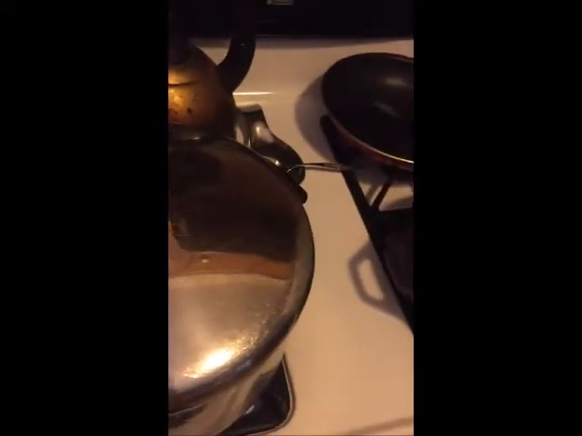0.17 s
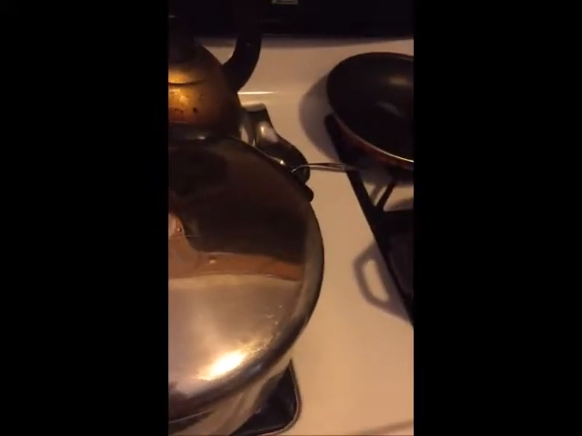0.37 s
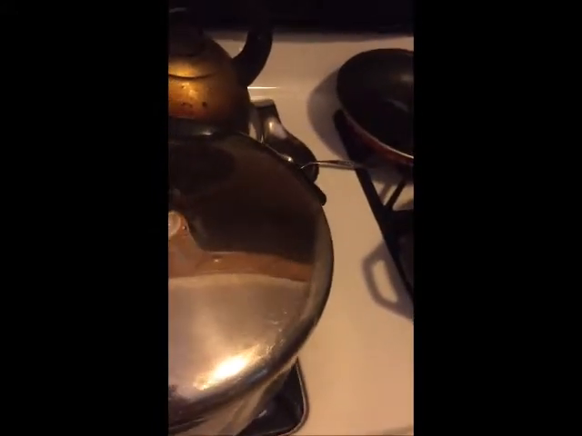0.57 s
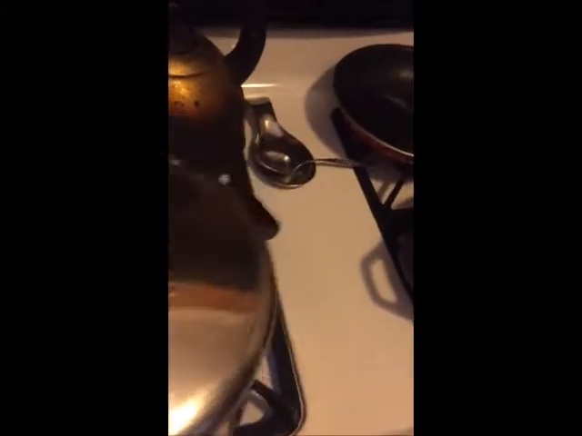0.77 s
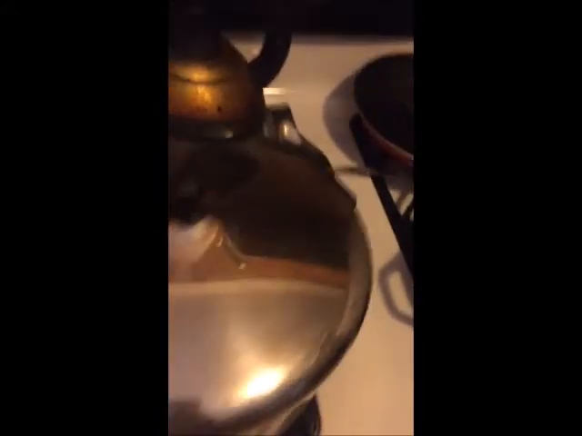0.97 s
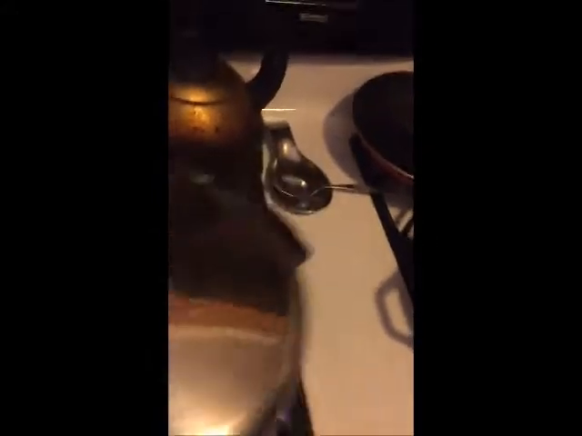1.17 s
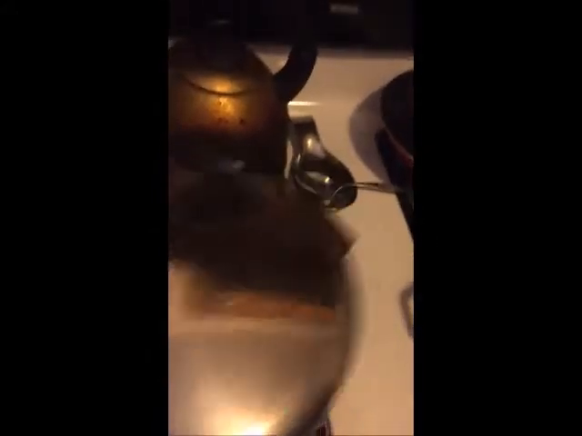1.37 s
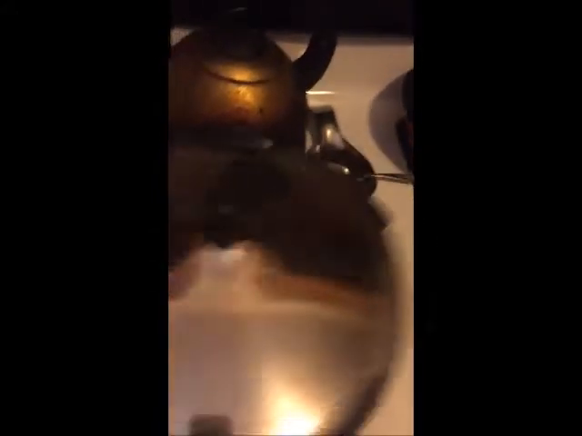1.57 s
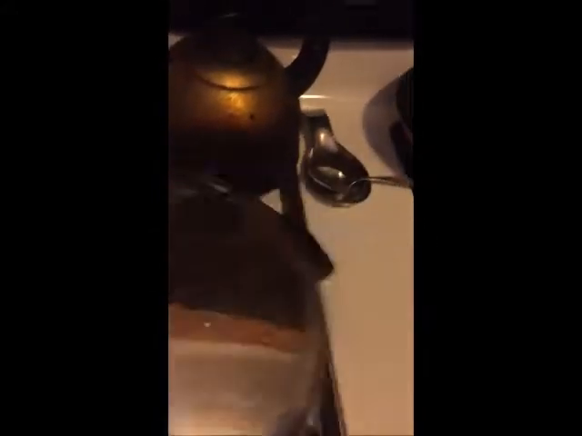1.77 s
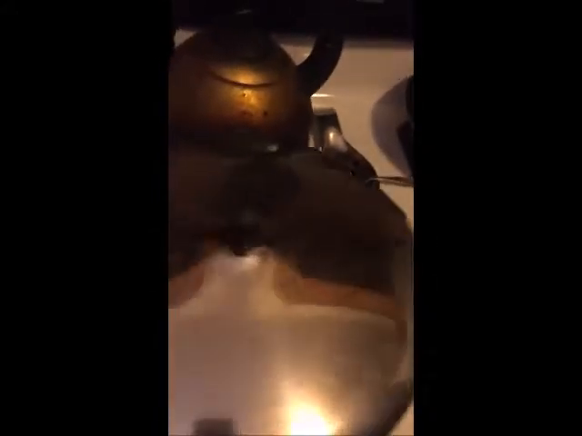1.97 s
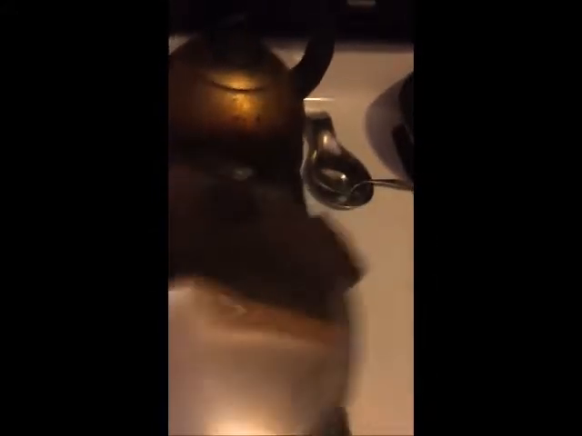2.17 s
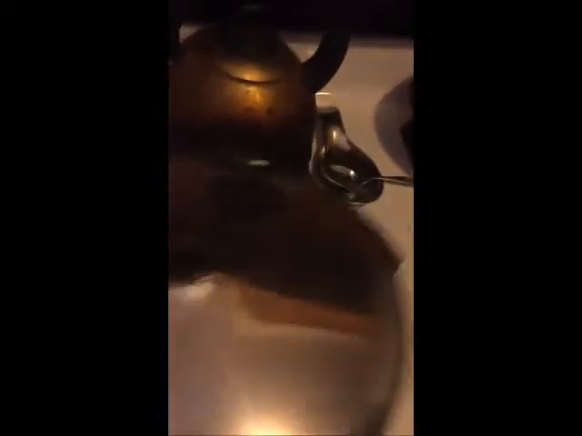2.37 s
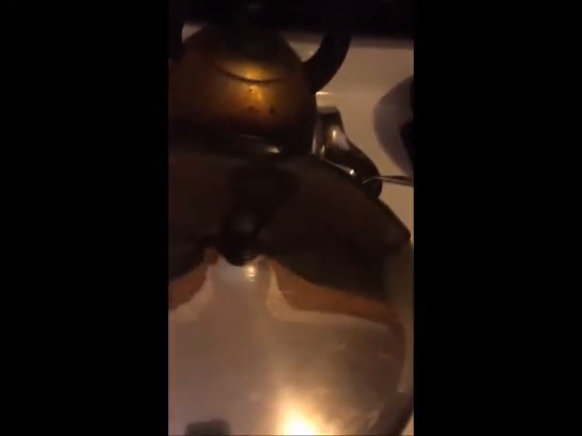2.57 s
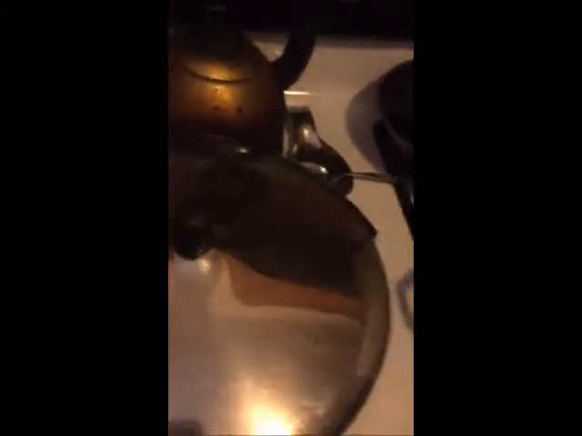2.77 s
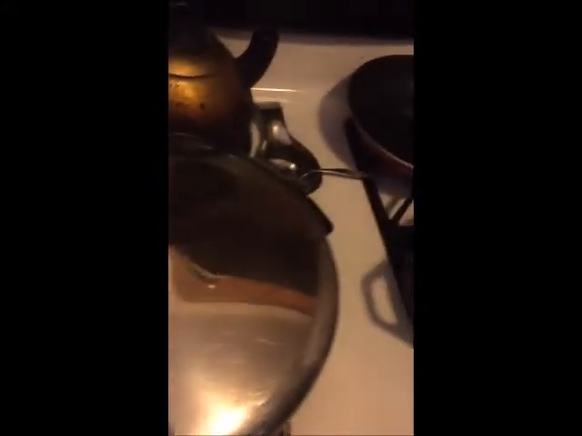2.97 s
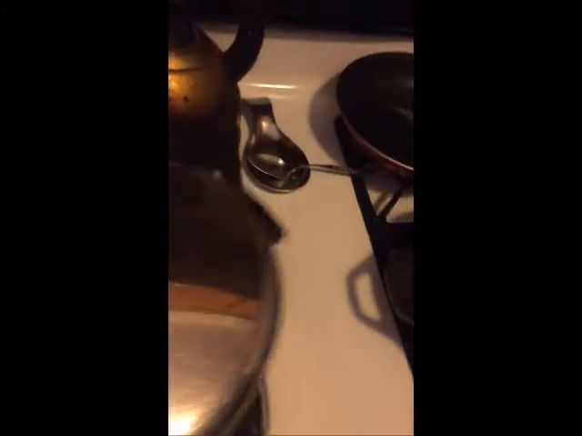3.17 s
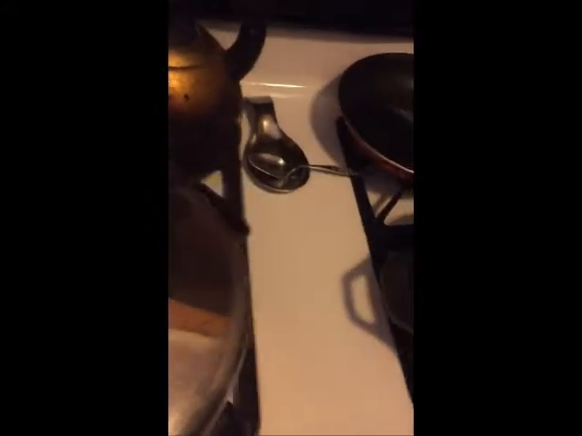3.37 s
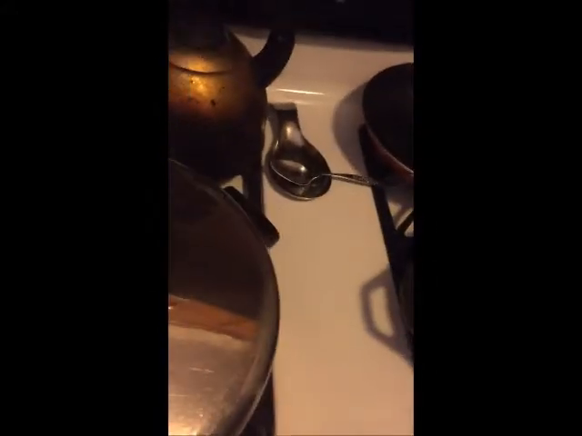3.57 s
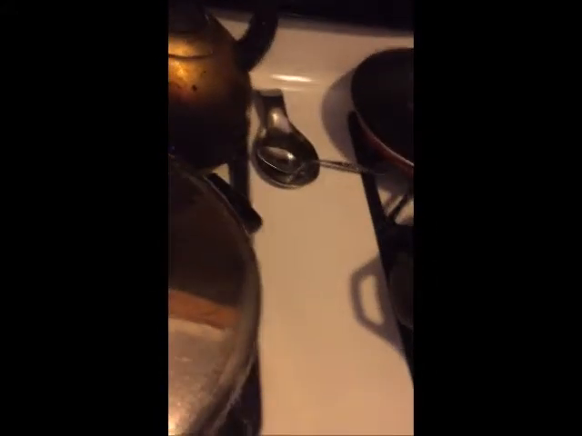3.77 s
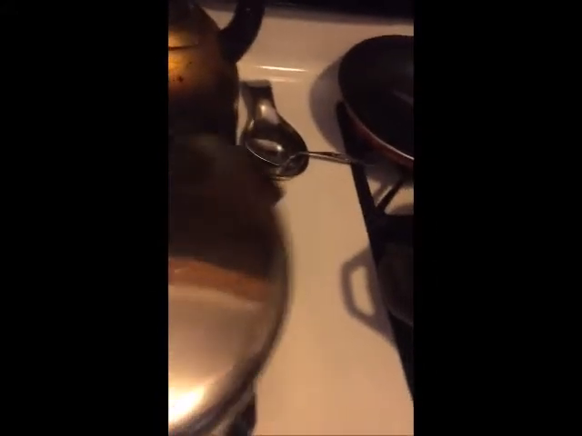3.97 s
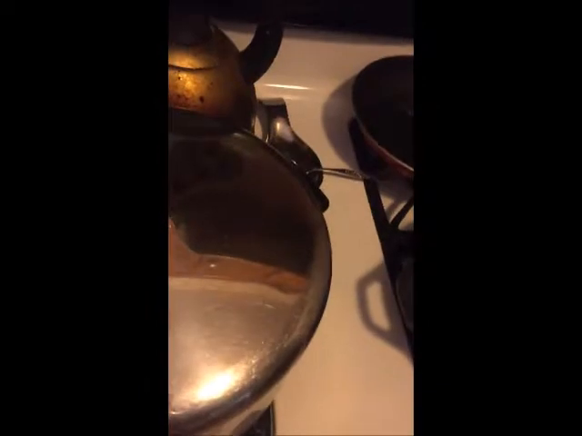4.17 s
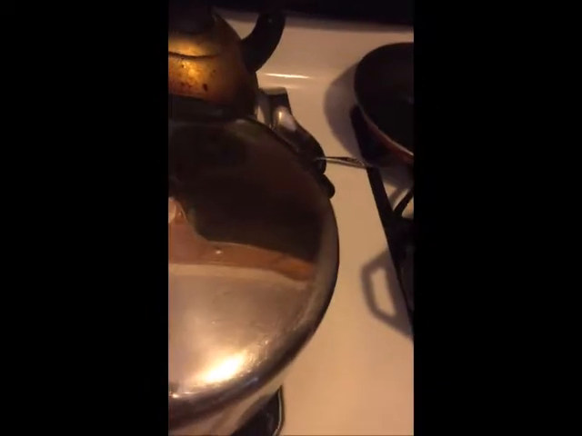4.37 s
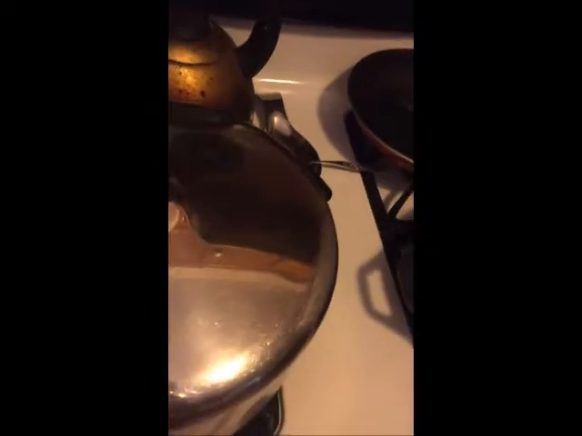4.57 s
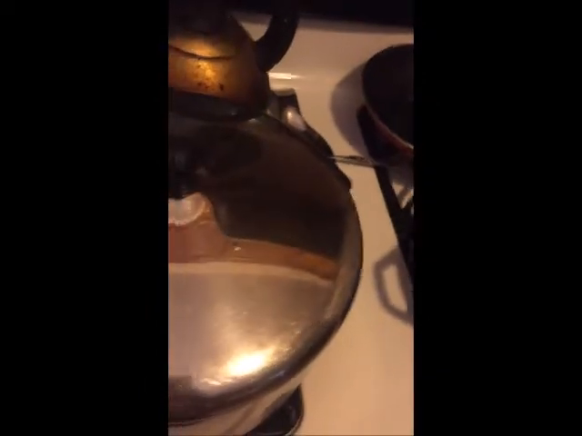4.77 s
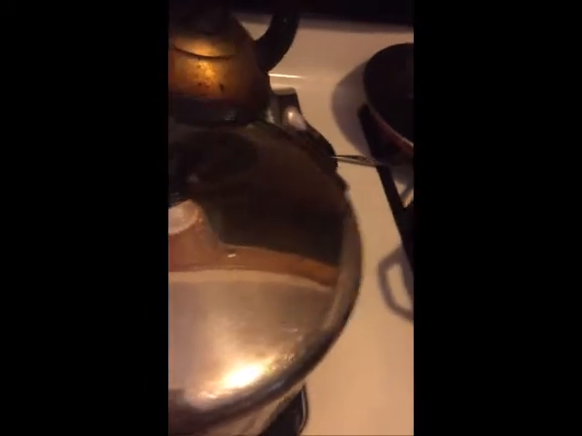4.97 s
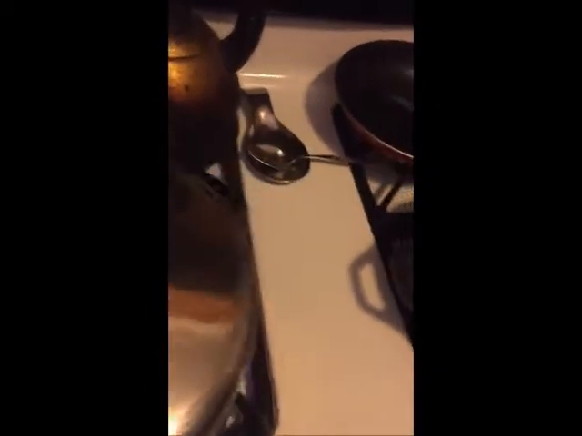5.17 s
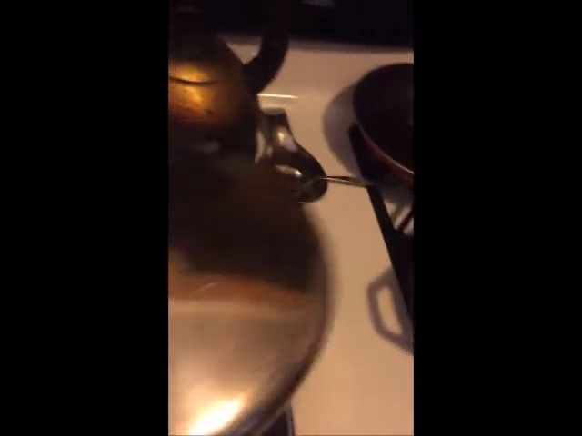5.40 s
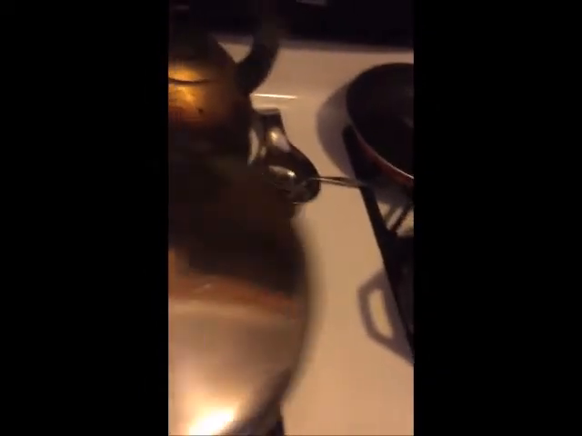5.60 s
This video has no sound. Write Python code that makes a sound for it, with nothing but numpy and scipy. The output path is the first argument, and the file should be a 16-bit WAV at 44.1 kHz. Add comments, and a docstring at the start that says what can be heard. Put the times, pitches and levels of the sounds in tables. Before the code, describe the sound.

A gas burner rushes softly throughout, heard close up in a small kitchen with a short reverberation. For the first second, popcorn kernels pop unevenly inside a lidded steel pot, each a crisp crack with a small thump and a brief metallic ring. A scrape begins at about 0.7 seconds. From 1 to 2.7 seconds the pot is shaken hard, the loudest stretch: its base grinds back and forth and clanks on the iron grate, kernels rattle and the loose lid chinks. A quick cluster of pops follows around 2.9 seconds. Scattered pops continue, with a short scrape and two knocks at about 3.3 to 3.5 seconds and a soft slide with dull taps just after 4. Pops come thicker from 4.3 to 4.9 seconds. Scraping returns at 5.1, with a sharp clank and lid chink near 5.4 and a last light scrape.

```python
"""A small kitchen, close to a gas stove: popcorn pops in a lidded steel pot shaken on the iron grate.
Each bursting kernel is an impulse: its hull cracks, the pot rings and a puff of steam thumps the air
under the lid. Stick-slip friction makes the base scrape; impacts on the bars excite the modes of pot
and grate, and the loose lid chinks. The burner rushes softly underneath."""
import sys
import numpy as np
from scipy import signal
from scipy.fft import rfft, irfft
from scipy.io import wavfile
from scipy.ndimage import uniform_filter1d

SR = 44100
rng = np.random.default_rng(int(sys.argv[2]) if len(sys.argv) > 2 else 0)


def materialize(psi):
    """Save the field psi as 16-bit PCM at rate SR to the path in sys.argv[1].

    A 1-D psi becomes a single channel; in a 2-D psi each row is a channel.
    """
    bounded = np.clip(np.atleast_2d(psi).T, -1, 1)
    quanta = np.round(bounded * 32767).astype(np.int16)
    wavfile.write(sys.argv[1], SR, quanta)


N = 248724
RING_SIZE = 12288  # samples in one impulse response
AGE = np.arange(RING_SIZE) / SR  # time since an impact, s
TIME = np.arange(N) / SR


def undb(db):
    """Amplitude ratio of a level in decibels."""
    return 10 ** (np.asarray(db) / 20)


def unit(x):
    """Normalisation to unit energy."""
    return x / np.sqrt(np.sum(x ** 2) + 1e-18)


def peak(x, size=220):
    """Greatest short-time rms amplitude."""
    return np.sqrt(uniform_filter1d(x ** 2, size).max())


def blend(parts):
    """Superposition of (sound, peak level/dB) pairs."""
    return sum(x / peak(x) * undb(db) for x, db in parts)


def add(track, t, x):
    """Superposition of a sound on the track from t seconds on."""
    i = max(int(t * SR), 0)
    track[i:i + len(x)] += x[:max(N - i, 0)]


def fade(t60):
    """Exponential damping: 60 dB in t60 seconds."""
    return np.exp(-np.log(1000) * AGE / max(t60, 1e-3))


def swell(rise_s):
    """Onset transient: vibration needs a moment to spread round the pot."""
    return 1 - np.exp(-AGE / max(rise_s, 1e-4))


def walk(rate_hz):
    """Slow random modulation with a spread near 1."""
    return np.interp(TIME * rate_hz, np.arange(2048), rng.standard_normal(2048))


def band(x, lo_hz, hi_hz, order=2):
    """Causal band-pass filtering."""
    edges = [lo_hz, min(hi_hz, SR / 2 - 1)]
    return signal.sosfilt(signal.butter(order, edges, "band", fs=SR, output="sos"), x)


def split(x, low_hz=370, high_hz=3300):
    """A fourth-order crossover yields bass, middle and treble; group delay makes the bass lag."""
    def side(v, hz, kind):
        return signal.sosfilt(np.tile(signal.butter(2, hz, kind, fs=SR, output="sos"), (2, 1)), v)
    above = side(x, low_hz, "high")
    return side(x, low_hz, "low"), side(above, high_hz, "low"), side(above, high_hz, "high")


def colour(x, spectrum, patchy_db=0, patch_hz=110):
    """Spectral shaping; random peaks stand for the fine modes that one blow happens to favour."""
    hz, db = np.transpose(spectrum)
    f = np.maximum(np.arange(len(x) // 2 + 1) * SR / len(x), 1)
    chance = rng.standard_normal(size=1024)
    patches = patchy_db * np.interp(f / patch_hz, np.arange(len(chance)), chance)
    gain = undb(np.interp(np.log(f), np.log(hz), db) + patches)
    return irfft(rfft(x) * gain, len(x))


def ring(modes, scatter_db, detune):
    """Modal superposition: a random striking point gives each damped mode its own share and sign."""
    out = 0
    for (hz, db, t60), (share, shift, side) in zip(modes, rng.uniform(-1, 1, (len(modes), 3))):
        wave = fade(t60) * np.sin(2 * np.pi * hz * (1 + 2 * detune * shift) * AGE)
        out = out + np.sign(side) * undb(db + scatter_db * share) * unit(wave)
    return unit(out)


def contacts(n, rate_hz, spread_db):
    """A Poisson train of tiny impacts, a few much harder than the rest."""
    hits = rng.random(n) < rate_hz / SR
    strength = undb(spread_db * np.minimum(rng.standard_normal(n), 2))
    return hits * strength * rng.choice([-1, 1], n)


def burner(level_db=-44.5, flutter_db=7.0):
    """Combustion noise of the gas flame: a low rush that flutters within bounds, and a smooth hiss."""
    # flame spectrum: f/Hz, level/dB
    flame_spectrum = [(30, -2), (100, 9), (200, 5.5), (420, -9.5), (700, -1), (1100, -8.5), (1900, -10.5),
                      (3000, -16), (4600, -26), (6000, -28.5), (10000, -36.5), (16000, -47)]
    flame = colour(rng.standard_normal(N), flame_spectrum)
    bass, mid, treble = split(flame / np.std(flame))
    rush = bass * undb(flutter_db * np.tanh(walk(8.8)))
    return undb(level_db) * (rush + mid * undb(0.9 * walk(8)) + treble)


def kitchen(x, wet_db=-13, low_t60=0.58, mid_t60=0.4, high_t60=0.26, build_s=0.013):
    """Reverberation: stove top, wall and cupboards add a short diffuse tail."""
    bass, mid, treble = split(rng.standard_normal(RING_SIZE))
    tail = bass * fade(low_t60) + mid * fade(mid_t60) + treble * fade(high_t60)
    tail *= 1 - np.exp(-(AGE / build_s) ** 2)
    return x + undb(wet_db) * signal.fftconvolve(x, unit(tail))[:N]


def pot(modes_db=-2, bass_t60=0.15, mid_t60=0.13, treble_t60=0.1):
    """Impulse response of the pot: distinct modes over a dense crowd of short-lived ones."""
    # spectrum of the dense wall modes: f/Hz, level/dB
    wall_spectrum = [(30, -73), (70, 4), (200, 12), (320, 3.5), (460, 3.5), (800, 5), (1100, 0.5),
                     (1700, 0.5), (2400, -4.5), (4200, -11), (4950, -15), (6000, -11), (10000, -28),
                     (16000, -32.5)]
    # distinct modes of the pot: f/Hz, level/dB, t60/s
    pot_modes = [(169.2, -8, 0.12), (193.4, -8.5, 0.066), (237.3, -6, 0.17), (312.6, 2, 0.087),
                 (423, -21.5, 0.9), (567.6, -10, 0.37), (677.2, -4.5, 0.085), (751.3, -6, 0.089),
                 (935, -11.5, 0.26), (1060, -40.5, 0.16), (1284, -10.5, 0.035), (1704, -14, 0.056),
                 (1807, -6, 0.13), (1950, -7.5, 0.032), (2324, -11.5, 0.055), (2736, -17, 0.37),
                 (3245, -20, 0.83), (3965, -19, 0.22), (4614, -19.5, 0.27), (5480, -22, 0.18),
                 (5970, -22, 0.079), (6610, -26, 0.11), (8420, -27.5, 0.12), (8970, -25, 0.047),
                 (9570, -26, 0.066), (11710, -28, 0.056)]
    bass, mid, treble = split(colour(rng.standard_normal(RING_SIZE), wall_spectrum, patchy_db=4))
    crowd = bass * fade(bass_t60) + mid * fade(mid_t60) + treble * fade(treble_t60)
    return unit(unit(crowd) + undb(modes_db) * ring(pot_modes, scatter_db=6.5, detune=0.0039))


def crack(t60):
    """Brittle fracture of a hull: a damped burst of broadband noise."""
    # spectrum of the crack: f/Hz, level/dB
    hull_spectrum = [(200, 4), (1000, -11.5), (3000, -5.5), (4500, -7.5), (6000, -3.5), (7400, -7.5),
                     (9500, 7), (11200, 0.5), (13000, -3.5), (16000, -19)]
    return colour(rng.standard_normal(RING_SIZE), hull_spectrum, patchy_db=3.5, patch_hz=260) * fade(t60)


def taps(rise_s=0.0022):
    """Contact time limits bandwidth: the soft blows of the rocking pot leave its high modes quiet."""
    # light contacts: t/s, level/dB, upper cutoff f/Hz
    soft_blows = [(0.338, -31.5, 1000), (0.434, -34.5, 800), (0.587, -29, 950), (2.847, -25.5, 1180),
                  (3.518, -27.5, 6100), (3.540, -18, 1400), (3.862, -27, 1720), (4.092, -24.5, 1700),
                  (4.111, -20, 1220), (4.163, -23.5, 900), (4.216, -23.5, 402), (4.835, -22.5, 1180),
                  (4.975, -35, 914), (5.246, -17, 350), (5.308, -20.5, 5000), (5.576, -17, 1070)]
    out = np.zeros(N)
    for t, db, cutoff_hz in soft_blows:
        tap = band(pot(), 49, cutoff_hz, order=3) * swell(rise_s)
        add(out, t, blend([(tap, db)]))
    return out


def lid(level_db=-3):
    """Contact damping: the loose lid hops on the rim, which stops its ring almost at once."""
    # hops of the lid: t/s, level/dB
    chinks = [(0.886, -24), (0.933, -15), (1.205, -5), (1.274, -13), (1.331, -2.5), (1.3548, -8),
              (1.61, -15.5), (1.7942, -20.5), (1.9966, -7.5), (2.0455, -6.5), (2.2478, -3.5), (2.27, -10),
              (2.3221, -5.5), (2.5651, -8), (2.5996, -11.5), (2.6523, -16), (2.8494, -45), (3.448, -27),
              (3.8622, -27.5), (5.308, -14.5)]
    # modes of the lid: f/Hz, level/dB, t60/s
    lid_modes = [(1680, -6.5, 0.16), (1757, 1.5, 0.08), (1873, -6.5, 0.18)]
    out = np.zeros(N)
    for t, db in chinks:
        add(out, t, blend([(ring(lid_modes, scatter_db=1, detune=0.0031), db + level_db)]))
    return out


def slips(count=14, size=1100):
    """Stick-slip excitation: the contact point wanders over the base, so the timbre keeps changing."""
    spots = [pot() for _ in range(count)]
    out = np.zeros(N)
    for start in range(0, N, size):
        force = unit(contacts(size, rate_hz=400, spread_db=7))
        add(out, start / SR, signal.fftconvolve(force, spots[rng.integers(count)]))
    return out


def push(start_s, rise_s, hold_s, slowing_db_per_s=117):
    """Relative sliding speed in one stroke: the hand raises and holds it, then friction slows the pot."""
    age = TIME - start_s
    slowing = undb(-slowing_db_per_s * np.maximum(age - rise_s - hold_s, 0))
    return np.clip(age / max(rise_s, 1e-3), 0, 1) * slowing


def scrape(level_db=-3, bass_db=-2, bright_db=-1, kernels_db=5, judder_db=1.02,
           groan_db=-2, groan_hz=320, groan_top_db=-23, turn_s=0.014, treble_power=1.71):
    """Sliding friction: the base groans and grinds, brighter with speed; hard shakes rattle kernels."""
    # pushes and pulls of the pot: t/s, rise/s, hold/s, level/dB, relative treble/dB
    strokes = [(0.743, 0.091, 0.11, -25.5, -13), (0.981, 0.017, 0.023, -16.5, -8),
               (1.139, 0.01, .1, -15, -4), (1.318, 0.0097, 0.013, -14.5, 0),
               (1.489, 0.039, 0.041, -17, -5.5), (1.649, .01, 0.047, -16.5, -6),
               (1.817, 0.034, 0.058, -15, -4), (1.976, 0.011, 0.051, -15.5, -1),
               (2.149, 0.025, .03, -13.5, -3.5), (2.232, 0.0078, 0.11, -17, -2.5),
               (2.469, 0.028, 0.018, -18, -5.5), (2.524, 0.02, 0.043, -16, -5),
               (2.644, 0.013, 0.039, -21, -10.5), (2.776, 0.046, 0.044, -26.5, -13.5),
               (3.195, 0.027, 0.15, -31, -19), (3.332, 0.018, 0.013, -20, -13),
               (4.048, 0.08, 0.075, -23.5, -12.5), (5.112, .09, 0.12, -24.5, -13.5),
               (5.357, .012, 0.011, -16, -2), (5.554, 0.047, .04, -23.5, -11)]
    grind = slips()
    bands = (*split(grind), band(grind, 0.927 * groan_hz, 1.076 * groan_hz))
    bass, mid, treble, groan = (x / np.std(x) for x in bands)
    kernel_hits = contacts(N, rate_hz=260, spread_db=6)
    ticks = signal.fftconvolve(kernel_hits, band(crack(t60=.02), 3000, 15000, order=1))[:N]
    rattle = undb(kernels_db) * ticks / np.std(ticks)
    force, sizzle = np.zeros(N), np.zeros(N)
    for t, rise_s, hold_s, db, treble_db in strokes:
        speed = push(t, rise_s, hold_s)
        # the previous stroke comes to a stop as the pot reverses
        stopping = np.clip((t - TIME) / turn_s + .5, 0, 1)
        force = force * stopping + undb(db) * speed
        sizzle = sizzle * stopping + undb(db + treble_db) * speed ** treble_power
    body = force * (undb(bass_db) * bass + mid)
    # the groan belongs to slow, sticky sliding and grows no further in a hard shake
    body += np.minimum(force, undb(groan_top_db)) * undb(groan_db) * groan
    out = body + sizzle * (undb(bright_db) * treble + force * rattle)
    return out * undb(level_db + judder_db * walk(45))


def knocks(level_db=-4, bright_db=-1, boom_db=-3, iron_db=-7, bounce=0.22, rise_s=0.0011):
    """Impact and rebound: the base hits a bar and chatters to rest; pot and grate both ring."""
    # blows on the grate: t/s, pot middle/dB, treble/dB, bass/dB, grate ring/dB, chatter decay/s
    blows = [(0.978, -13.5, -41, -17, -15.5, 0.013), (1.0, -13.5, -19, -15.5, -21, 0.026),
             (1.15, -8.5, -24, -20, -26, 0.024), (1.177, -9, -25, -38, -41, 0.012),
             (1.204, -5, -13, -13, -16, 0.015), (1.234, -7, -15.5, -18, -17, 0.0088),
             (1.331, -6.5, -14.5, -6, -9, 0.0059), (1.497, -15.5, -25, -42, -27, 0.0048),
             (1.534, -11.5, -21.5, -36, -24, 0.013), (1.651, -12, -32.5, -18, -20, 0.012),
             (1.663, -8, -17, -20, -7, 0.017), (1.694, -26, -17.5, -17, -14, 0.019),
             (1.836, -11, -44, -22, -16, 0.0062), (1.858, -12.5, -20, -12.5, -14, 0.06),
             (1.894, -10.5, -20, -18, -10, 0.038), (1.985, -10, -21, -12, -20, 0.03),
             (2.045, -13, -18.5, -15, -12, 0.027), (2.154, -9.5, -23, -10.5, -16, 0.011),
             (2.179, -25, -18.5, -22, -37, 0.011), (2.247, -6.5, -11.5, -8, -9, 0.012),
             (2.269, -4.5, -17.5, -12, -34, 0.014), (2.322, -11, -22, -13.5, -40, 0.037),
             (2.377, -12, -22.5, -22, -30, 0.013), (2.469, -17.5, -30.5, -19, -19, 0.02),
             (2.487, -14.5, -27, -18, -15, 0.048), (2.55, -8.5, -19, -13, -57, 0.015),
             (2.564, -16, -33, -19, -60, 0.014), (2.651, -12.5, -29, -11, -31, 0.052),
             (3.339, -14.5, -38, -14.5, -40, 0.0055), (3.526, -10, -20.5, -33, -10, 0.021),
             (5.361, -11, -23, -14.5, -26, 0.012), (5.373, -4, -21, -39, -10.5, 0.0043),
             (5.387, -22, -23, -23, -16, 0.0098)]
    # modes of the iron grate: f/Hz, level/dB, t60/s
    grate_modes = [(865, 0, .13), (1066, -4, .14), (1421, 1, .14), (2213, -11, .12), (3020, -8, .11),
                   (3230, -12, .11), (4570, -15, .11), (5276, -15, .11), (5970, -15, .11), (8200, -15, .08),
                   (8533, -15, .1)]
    out = np.zeros(N)
    for t, mid_db, treble_db, bass_db, grate_db, chatter_s in blows:
        force = bounce * contacts(RING_SIZE, rate_hz=600, spread_db=2) * np.exp(-AGE / chatter_s)
        force[0] = 1  # the first impact
        bass, mid, treble = split(signal.fftconvolve(force, pot())[:RING_SIZE] * swell(rise_s))
        grate = ring(grate_modes, scatter_db=-1.5, detune=0.0148) * swell(rise_s)
        add(out, t, blend([(bass, bass_db + boom_db), (mid, mid_db + level_db),
                           (treble, treble_db + bright_db), (grate, grate_db + iron_db)]))
    return out


def pops(thump_hz=172, thump_t60=0.041, puff_s=0.0025, crack_t60=0.084, rise_s=0.00071,
         crack_db=-2, snap_db=-4.5, ring_db=-3, landing_db=-17):
    """Sudden pressure release: the hull cracks, the pot rings and steam swings the air under the lid."""
    # bursting kernels: t/s, crack/dB, thump/dB, ring/dB
    bursts = [(0.036, -36.5, -43, -45), (0.077, -35, -21, -25), (0.141, -50, -58, -49),
              (0.245, -33, -36, -30), (0.428, -44.5, -33, -49), (0.4725, -28, -27, -28),
              (0.5187, -26, -22, -24.5), (0.5344, -34, -53, -48), (0.6592, -32.5, -27.5, -29),
              (0.7146, -34, -23.5, -26), (0.8167, -26, -21, -24), (1.0015, -12.5, -11.5, -35),
              (1.106, -28, -39, -40), (2.6415, -18.5, -43, -50), (2.7924, -49, -26, -21.5),
              (2.9029, -25, -15, -26.5), (2.9411, -22.5, -19.5, -35), (2.9683, -17.5, -27, -23),
              (3.173, -31, -37, -43), (3.1943, -25, -17.5, -26), (3.267, -37, -27, -54),
              (3.3545, -39, -25, -27), (3.4445, -26.5, -33, -30), (3.7227, -24.5, -25.5, -33),
              (3.766, -34, -25, -31), (4.0082, -34.5, -30, -32.5), (4.0478, -33, -27.5, -32),
              (4.278, -31, -32, -32), (4.3932, -27.5, -19, -22.5), (4.4569, -30, -24.5, -25.5),
              (4.517, -31.5, -24.5, -39), (4.5618, -35.5, -33, -31), (4.575, -29.5, -18.5, -23),
              (4.635, -27, -24.5, -21.5), (4.6836, -58, -59, -55), (4.8209, -29, -22, -20.5),
              (4.9111, -31, -43, -29)]
    # air and wall resonances excited from inside: f/Hz, level/dB, t60/s
    cavity_modes = [(550, -9, .07), (667, -2, .08), (745, -7, .09), (1076, 0, .07), (1180, -8, .06),
                    (1442, -9, .06), (1785, -3, .08), (1845, -4, .07), (2024, -7, .07), (2583, -10, .05),
                    (2928, -8, .03), (3380, -12, .05), (5189, -11, .04), (5900, -13, .04), (6180, -13, .04)]
    out = np.zeros(N)
    for t, hull_db, thump_db, cavity_db in bursts:
        fracture = crack(crack_t60) * swell(rise_s)
        hull, snap = band(fracture, 400, 8000), band(fracture, 8500, 17000)
        cavity = ring(cavity_modes, scatter_db=6, detune=.02) * swell(rise_s)
        hz = thump_hz * (1 + 0.033 * rng.standard_normal())
        thump = -np.sin(2 * np.pi * hz * AGE) * fade(thump_t60) * swell(puff_s)
        add(out, t, blend([(hull, hull_db + crack_db), (snap, hull_db + snap_db),
                           (cavity, cavity_db + ring_db), (thump, thump_db)]))
        flight_s = rng.uniform(.012, .05)  # the flake lands soon after
        add(out, t + flight_s, blend([(crack(t60=0.013), hull_db + landing_db)]))
    return out


def scene():
    """Superposition in one channel: pot and popcorn reverberate in the kitchen, over the flame."""
    return (kitchen(pops() + knocks() + lid() + taps() + scrape()) + burner())[None]


def record(dry, low_cut_hz=42, top_hz=16200):
    """Saturation and band limiting: the microphone rounds peaks and cuts the deepest bass and the top."""
    rounded = 1.238 * np.tanh(dry / 1.47)
    lean = signal.sosfilt(signal.butter(3, low_cut_hz, "high", fs=SR, output="sos"), rounded)
    return signal.sosfilt(signal.ellip(10, .2, 90, top_hz, fs=SR, output="sos"), lean)


dry = scene()
out = record(dry)
materialize(out)
```